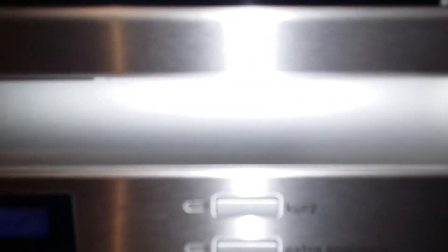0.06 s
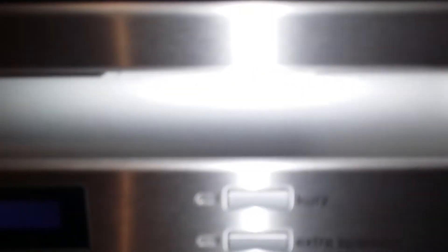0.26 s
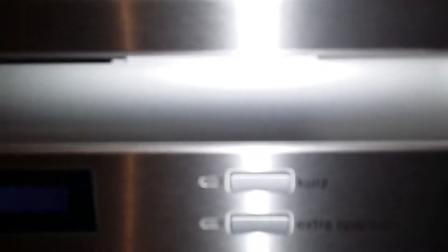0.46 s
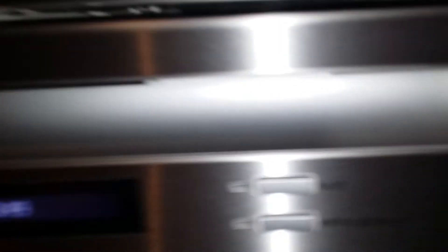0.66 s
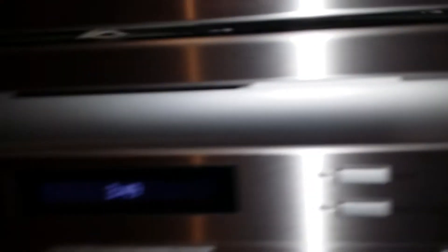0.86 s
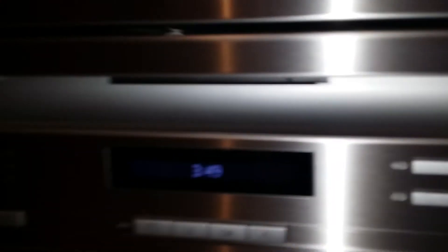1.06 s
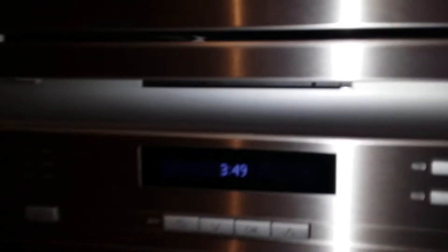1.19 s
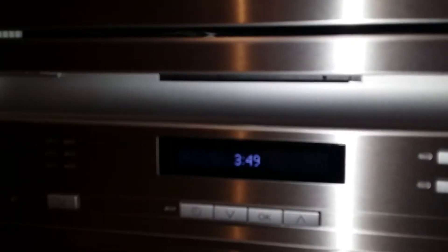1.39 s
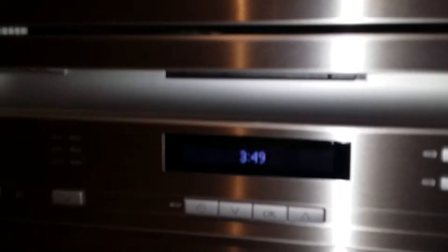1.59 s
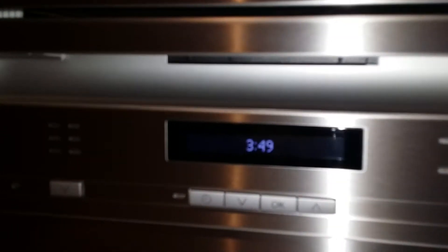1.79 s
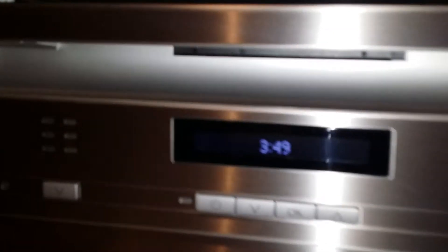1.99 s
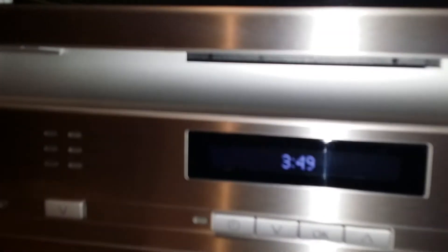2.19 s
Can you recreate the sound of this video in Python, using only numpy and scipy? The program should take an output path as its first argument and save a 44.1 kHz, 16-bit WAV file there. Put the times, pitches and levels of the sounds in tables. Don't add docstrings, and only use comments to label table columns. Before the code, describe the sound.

Dishwasher door pushed closed early on, with a sharp clattering latch and a boxy low thump that shakes the racks; a soft settling tick follows, then near-quiet room air with very faint distant floor knocks.

```python
import sys
import numpy as np
from scipy import signal
from scipy.fft import rfft, irfft, next_fast_len
from scipy.io import wavfile
from scipy.ndimage import uniform_filter1d

SR = 44100
rng = np.random.default_rng(int(sys.argv[2]) if len(sys.argv) > 2 else 0)


def undo_db(level):
    steps = np.asarray(level, float) / 20
    return 10 ** steps


def dump(signal):
    limited = np.clip(np.atleast_2d(signal).T, -1, 1)
    pcm = np.round(limited * 32767).astype(np.int16)
    wavfile.write(sys.argv[1], SR, pcm)


N = 99225

# middle in seconds, peak level in dB, pitch in Hz, length in cycles, left minus right in dB.
PINGS = [(.2528, -20, 3500, 3, -20), (.2529, -24, 4800, 5, 20), (.2576, -12.5, 2200, 2.6, -18),
         (.2575, -25, 2500, 5, 16), (.2550, -23, 2900, 4, -18), (.2613, -24, 2400, 3, -18),
         (.2377, -32, 1800, 7, -10), (.2350, -40, 14500, 18, 9), (.2522, -42, 14200, 20, 0),
         (.2755, -45, 14200, 30, -4), (.2530, -28, 7500, 8, 3), (.2385, -31, 3800, 6, -3),
         (.2790, -27, 1500, 3, -12), (.2745, -26, 3600, 5, -8), (.2680, -24, 2000, 3, -9),
         (.2835, -27, 2500, 4, -4), (.3065, -40, 3900, 8, -4), (.4833, -54, 6500, 8, 6),
         (.8352, -66, 1520, 8, 0), (.4845, -57, 2750, 8, 0), (.8350, -63, 2000, 6, 0)]
# frequency in Hz, left minus right in dB.
LATCH_PAN = [(130, -0.5), (290, -3.5), (640, -1), (1400, -8), (3090, -7), (4500, 0), (6800, 3), (9300, -8),
             (12000, -1), (15000, 2)]


def unit(x):
    return x / np.sqrt(np.mean(x ** 2) + 1e-20)


def along(points, hz):
    f, v = np.transpose(points)
    return np.interp(np.log(hz + 1), np.log(f + 1), v)


def curve(rows):
    return np.interp(np.arange(N) / SR, *np.transpose(rows))


def filtered(x, response):
    n = x.shape[-1]
    m = next_fast_len(n + 8192)
    hz = np.fft.rfftfreq(m, 1 / SR)
    return irfft(rfft(x, m) * response(hz), m)[..., :n]


def sides(points, hz):
    return undo_db(along(points, hz) * [[.5], [-.5]])


def paired(pair, alike):
    def mid_and_side(hz):
        turn = np.arccos(np.clip(along(alike, hz), -1, 1)) / 2
        return np.array([np.cos(turn), np.sin(turn)])

    mid, side = filtered(pair, mid_and_side)
    return np.array([mid + side, mid - side])


def rush(gain, alike, size=N):
    noise = rng.standard_normal((2, size))
    return unit(filtered(paired(noise, alike), gain))


def add(out, s, sound, pan_db):
    part = out[:, round(s * SR):][:, :sound.shape[-1]]
    stereo = sound * undo_db([[pan_db / 2], [-pan_db / 2]])
    part += stereo[:, :part.shape[1]]


def resonances(peaks):
    def response(f):
        total = 0
        for k, (centre, width, db) in enumerate(peaks):
            total = total + (-1) ** k * undo_db(db) * 1j * f * width / (centre * centre - f * f + 1j * f * width)
        return total

    return response


def rise_and_die(s, db, rise_s, t60):
    t = np.arange(N) / SR
    return undo_db(db - 60 * np.where(t > s, (t - s) / t60, (s - t) / (4 * rise_s)))


def thumps():
    # peak in seconds, level in dB, rise in seconds, 60 dB decay in seconds.
    knocks = [(0.0, -56, 0.01011, 0.3062), (.07, -62.5, 0.01962, 0.83), (.825, -62, 0.03737, .3),
              (.875, -61, 0.037, 0.3044), (.94, -62, 0.018, 0.4613), (.7, -66.5, 0.047, 0.39335),
              (1.07, -75, 0.03401, .4), (1.651, -72, 0.035, .3), (1.35, -72.5, .05, .5),
              (1.5, -75.5, 0.047, 0.4194), (1.718, -69, .05, .3), (1.87, -71, .04, .4),
              (2.23, -68.5, 0.06984, .5)]
    # resonance in Hz, width in Hz, level in dB.
    floorboards = [(57.18, 40, -9.5), (102.82, 30, 1), (160, 25, -5), (258.05, 73, -13.5), (375, 40, -12.5),
                   (452.06, 17, -13.5), (508.61, 61, -12.5), (789.8, 300, -24)]
    power = sum(rise_and_die(*knock) ** 2 for knock in knocks)
    return np.sqrt(power) * rush(resonances(floorboards), [(100, 0.9367), (800, .7)])


def earlier_clatter():
    t, t60 = np.arange(N) / SR, 0.29
    clatter = rush(lambda f: f / (f + 500) / (1 + (f / 3500) ** 2), [(500, .6), (3000, .2)])
    return undo_db(-65.5 - 60 * t / t60) * clatter


def air_and_hiss():
    # frequency in Hz, level in dB per Hz.
    air_colour = [(15, -46.5), (48, -12.5), (207, -10.5), (285, -9.5), (341, -14.5), (386, -11),
                  (1800, -23), (2340, -45.5), (3960, -120)]
    hiss_colour = [(700, -42), (1200, -11), (3400, -10.5), (5200, -5.5), (6200, -4), (6900, 0.5),
                   (7700, -5.5), (8800, -11), (14300, -11.5), (14800, -37)]
    # frequency in Hz, likeness of left and right from -1 to 1.
    air_alike = [(60, 1), (240, 0.35), (950, -0.16), (3760, -0.01), (15000, -0.03)]
    # frequency in Hz, left minus right in dB.
    hiss_pan = [(60, -0.5), (240, -2), (950, -1), (2600, 0), (4300, 8), (5600, 13), (6900, 18), (8600, 7),
                (12000, 5), (15000, 3)]
    air = undo_db(-77) * rush(lambda hz: undo_db(along(air_colour, hz)), air_alike)
    hiss = undo_db(-71.5) * rush(lambda hz: undo_db(along(hiss_colour, hz)), [(5000, 0.073)])
    return filtered(air + hiss, lambda hz: sides(hiss_pan, hz))


def rubbing_seal():
    # time in seconds, level in dB.
    rub = [(.165, -88.5), (.19, -57), (.215, -48.5), (.232, -36.5), (.25, -42), (.3, -58), (.34, -88.5)]
    # frequency in Hz, level in dB per Hz.
    rubber = [(40, -6), (120, -0.5), (340, -3), (800, -12.5), (1300, -10), (3300, -11.5), (6000, -22.5),
              (14000, -35)]
    grains = undo_db(2.5 * unit(uniform_filter1d(rng.standard_normal(N), size=90)))
    noise = rush(lambda hz: undo_db(along(rubber, hz)) * sides(LATCH_PAN, hz), [(500, .8), (4000, 0.35)])
    return undo_db(curve(rub)) * unit(grains * noise)


def latch_snaps():
    # start in seconds, level in dB, tilt in dB per octave, 60 dB decay in seconds.
    snaps = [(0.2339, -31.5, 5, .05), (0.2374, -36, 1, 0.09), (0.2468, -29, -0.5, 0.057),
             (0.251, -19, 0.5, 0.05417), (0.2541, -19.5, -1, 0.054), (.2605, -22, -2, .06),
             (0.2716, -25.5, 4.5, .05), (0.2774, -25, -2, 0.066), (0.2836, -33.5, -1, .06),
             (0.3062, -38.5, -2.5, .04), (0.469, -59, -4, 0.1767), (.4825, -55, 0, 0.04)]
    # frequency in Hz, level in dB per Hz.
    plastic = [(400, -30.5), (800, -7), (1400, -4), (2400, -5), (4000, -10.5), (7000, -17), (9500, -24),
               (11500, -33), (14000, -33), (15200, -61)]
    treble_hz, treble_faster, crackle_db, attack_s = 8000, 2.6, 2.5, 0.00045
    out, t = np.zeros((2, N)), np.arange(SR // 5) / SR
    for s, db, tilt_db, t60 in snaps:
        def colour(hz):
            return undo_db(along(plastic, hz) + tilt_db * np.log2((hz + 1) / 3000))

        rattle = rush(colour, [(500, .8), (1500, -0.19), (9000, 0.017)], size=len(t))
        treble = filtered(rattle, lambda hz: hz ** 2 / (hz ** 2 + treble_hz ** 2))
        fade = undo_db(-60 * t / t60)
        dying = fade * (rattle - treble) + fade ** treble_faster * treble
        wobble = uniform_filter1d(rng.standard_normal((2, len(t))), size=30)
        crackle = undo_db(crackle_db * unit(wobble))
        add(out, s, undo_db(db) * crackle * (1 - np.exp(-t / attack_s)) * dying, 0)
    return filtered(out, lambda hz: sides(LATCH_PAN, hz))


def latch_pings():
    out, u = np.zeros((2, N)), np.arange(-400, 401) / SR
    for s, db, hz, cycles, pan_db in PINGS:
        bell = np.exp(-(2 * u * hz / cycles) ** 2)
        add(out, s + u[0], -undo_db(db) * bell * np.cos(2 * np.pi * hz * u), pan_db)
    return out


def shaken_racks():
    # time in seconds, level in dB.
    shudder = [(.244, -79.5), (.25, -37.5), (.29, -32), (.33, -39.5), (.5, -58), (.53, -66), (.8, -77.5)]
    # resonance in Hz, width in Hz, level in dB.
    panel = [(82, 45, -3.5), (127.56, 40, -3.5), (161.08, 16, 1.5), (256.7, 19, -1.5), (358.74, 24, -4.5),
             (473.3, 50, -7), (704.56, 300, -17)]
    shaking = rush(resonances(panel), [(100, 1.0), (400, .9), (1000, .6)])
    return undo_db(curve(shudder)) * shaking * undo_db([[-1.2], [1.2]])


def door():
    # start in seconds, level in dB, direction, contact in seconds.
    bumps = [(0.247, -19, 1, .004), (0.2529, -19.5, -1, 0.0036), (.2640, -16, 1, .003),
             (.2700, -16.5, -1, 0.0035), (.2802, -13, 1, .002), (.2895, -15, -1, .0025),
             (.3110, -17, 1, .0024), (.4565, -36, 1, 0.0034), (.4640, -39, 1, .0045),
             (.4730, -36, -1, 0.0032), (.4895, -41, -1, .004), (.5440, -46, -1, 0.009),
             (.5670, -53, -1, .008)]
    # tone in Hz, peak level in dB, 60 dB decay in seconds, start in seconds.
    cabinet = [
        (55.5, -20, 0.28, .247),
        (84, -31.5, .5, .262),
        (127, -31, 0.25163, 0.25786),
        (163, -23.5, 0.19, .268),
        (252, -24, 0.3, .272),
        (366, -29, 0.21, .262),
        (450, -33, .28, .27),
        (486, -41, .45, .28),
    ]
    pan_db, swell_s = -2, .006
    out, t = np.zeros((2, N)), np.arange(SR) / SR
    for s, db, way, contact_s in bumps:
        u = np.clip(t[:SR // 50] / contact_s, 0, 1)
        add(out, s, np.sign(way) * undo_db(db - 1) * np.sin(np.pi * u) ** 2, pan_db)
    for hz, db, t60, s in cabinet:
        swell = 1 - np.exp(-t / swell_s)
        add(out, s, undo_db(db - 60 * t / t60) * swell * np.sin(2 * np.pi * hz * t), pan_db)
    return filtered(out, lambda hz: (1j * hz / (24 + 1j * hz)) ** 4)


def kitchen_echo(x):
    # frequency in Hz, 60 dB decay in seconds.
    decay = [(100, 0.57), (500, .45), (2000, .35), (6000, 0.27), (9000, .2), (11500, .08), (14000, .06)]
    # frequency in Hz, likeness of left and right from -1 to 1.
    echo_alike = [(100, 0.97035), (600, 0.32), (2000, .2)]
    noise = paired(rng.standard_normal((2, SR)), echo_alike)
    hz, t, z = signal.stft(noise, SR, nperseg=512)
    fade = undo_db(-60 * t / along(decay, hz)[:, None])
    tail = signal.istft(z * fade, SR, nperseg=512)[1]
    late = np.pad(x, ((0, 0), (260, 0)))
    return signal.fftconvolve(late, tail / np.linalg.norm(tail[0]), axes=1)[:, :N]


def hums():
    # peak in seconds, peak level in dB, pitch in Hz, rise in seconds, 60 dB decay in seconds.
    tones = [
        (.875, -53, 112, .04, .14),
        (.83, -60, 108, .015, .15),
        (.85, -66, 519, .03, .3),
        (.86, -65, 161, .03, .3),
        (1.73, -62, 118, .035, .15),
        (.46, -71.5, 985, .03, .7),
        (.61, -63, 56, .02, .35),
        (.7, -68, 175, .02, .2),
    ]
    t = np.arange(N) / SR
    return sum(rise_and_die(s, db, rise_s, t60) * np.sin(2 * np.pi * hz * (t - s))
               for s, db, hz, rise_s, t60 in tones)


def rustle_and_whirr():
    # start in seconds, length in seconds, level in dB, pitch in Hz, width in Hz.
    swells = [
        (1.805, .045, -71, 2800, 7000),
        (.93, .3, -80, 1000, 250),
        (1.2, .4, -82, 980, 250),
        (.9, .7, -83, 2000, 900),
    ]
    t, out = np.arange(N) / SR, 0
    for s, long_s, db, hz, width in swells:
        swell = np.sin(np.pi * np.clip((t - s) / long_s, 0, 1))
        narrow = resonances([(hz, width, 0)])
        out = out + undo_db(db) * swell * rush(lambda f: narrow(f) ** 2, [(1000, 0.33)])
    return out


def scene():
    # time in seconds, gain in dB.
    gate_db = [(0, 4.5), (.15, 1.5), (.23, 6), (.3, 8), (.5, 10), (.515, 6.5), (.74, 0), (.86, 3),
               (1.2, 1.5), (1.6, 0.5), (2.25, -1)]
    gate = undo_db(curve(gate_db))
    bright = rubbing_seal() + latch_snaps() + latch_pings()
    low = door()
    echoed_low = filtered(low, lambda hz: hz ** 2 / (hz ** 2 + 99 ** 2))
    echo = kitchen_echo(undo_db(-19) * bright + undo_db(-17) * echoed_low)
    near = bright + low + shaken_racks() + echo
    slam_gain = gate[round(PINGS[0][0] * SR)]
    gated = (near / slam_gain + air_and_hiss()) * gate
    return gated + thumps() + earlier_clatter() + hums() + rustle_and_whirr()


def top_cut(x):
    return signal.sosfilt(signal.butter(12, 15550, fs=SR, output="sos"), x)


def record(dry):
    limited = filtered(dry, lambda hz: 1 / (1 + (hz / 15000) ** 80))
    return top_cut(limited - .0002)


dry = scene()
out = record(dry)
dump(out)
```